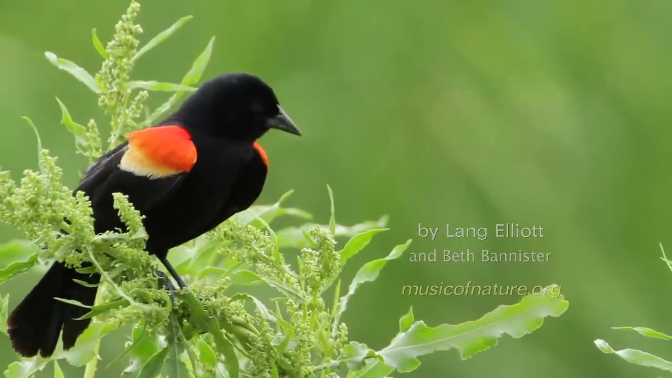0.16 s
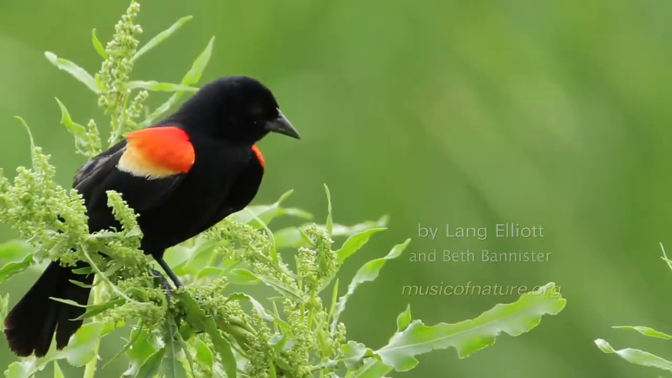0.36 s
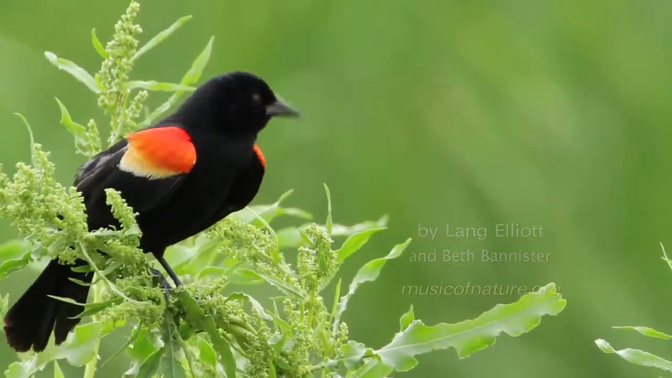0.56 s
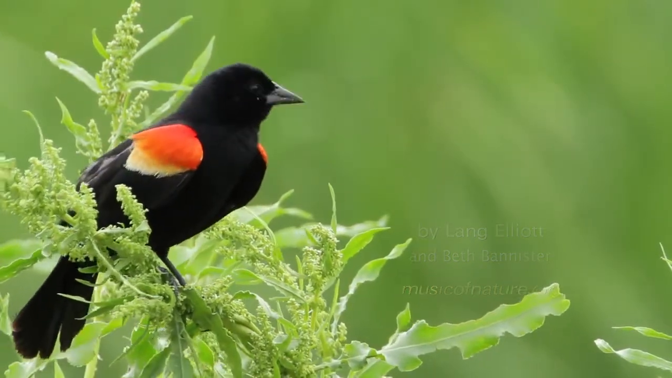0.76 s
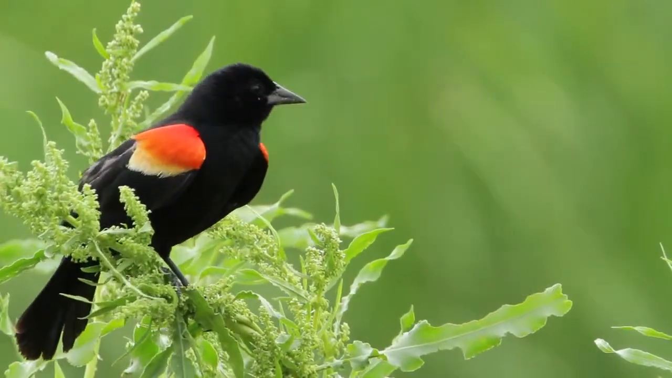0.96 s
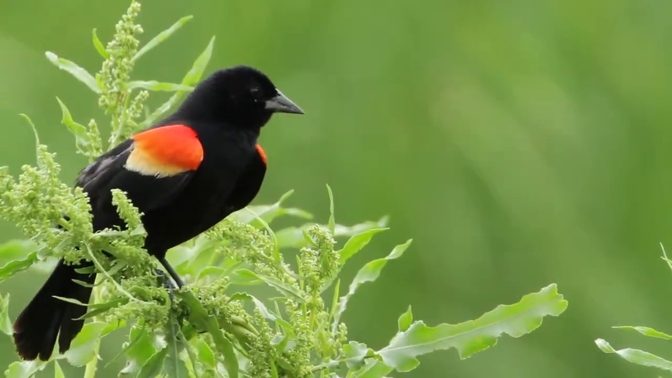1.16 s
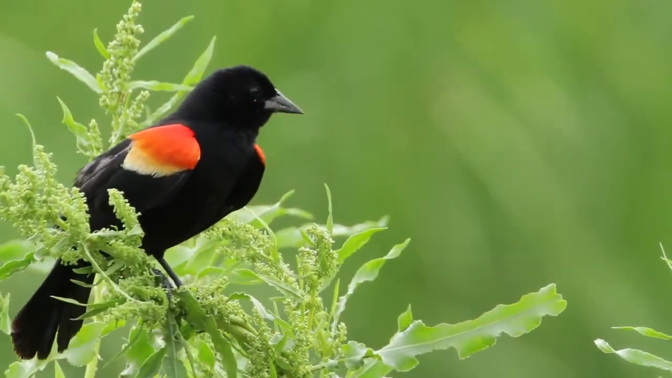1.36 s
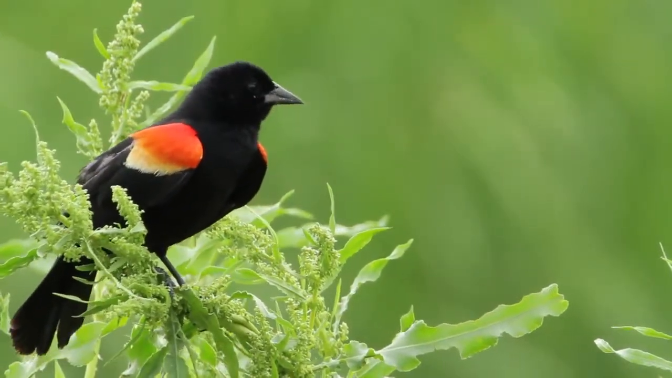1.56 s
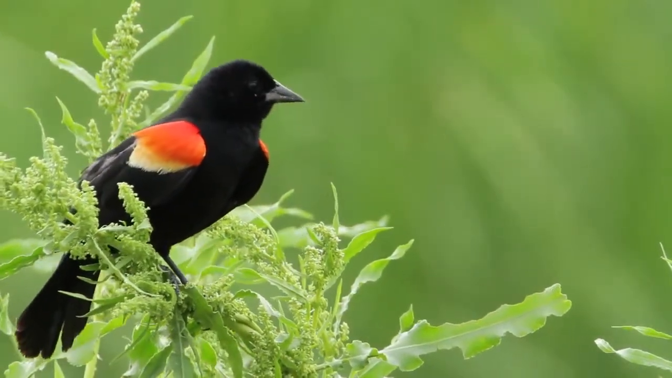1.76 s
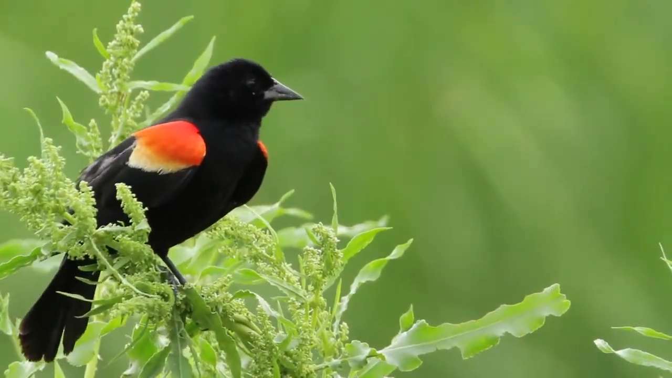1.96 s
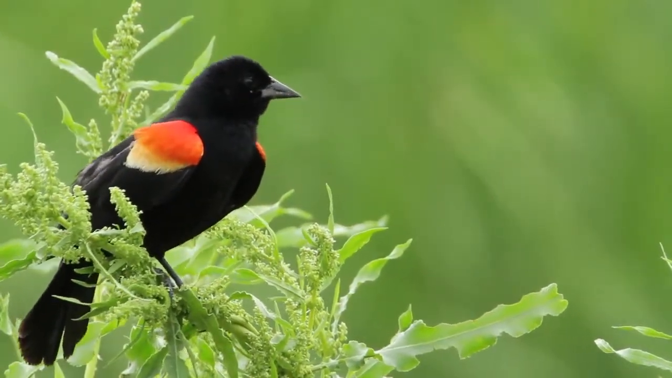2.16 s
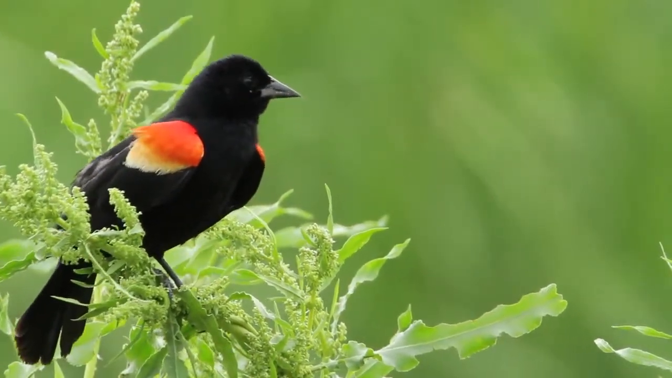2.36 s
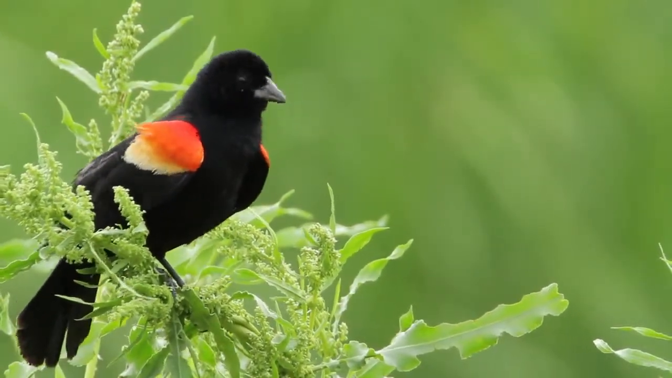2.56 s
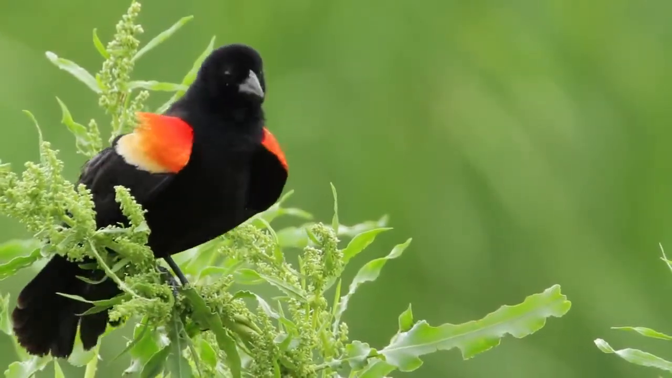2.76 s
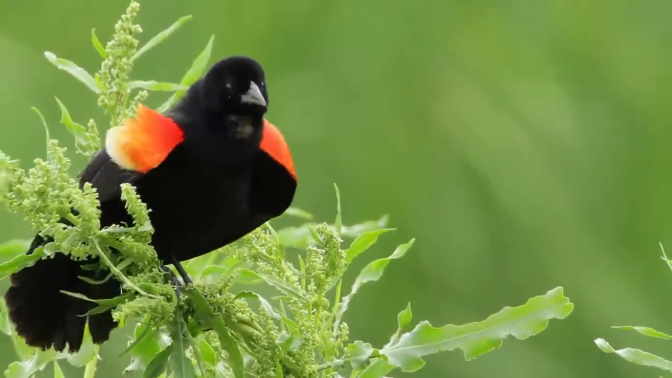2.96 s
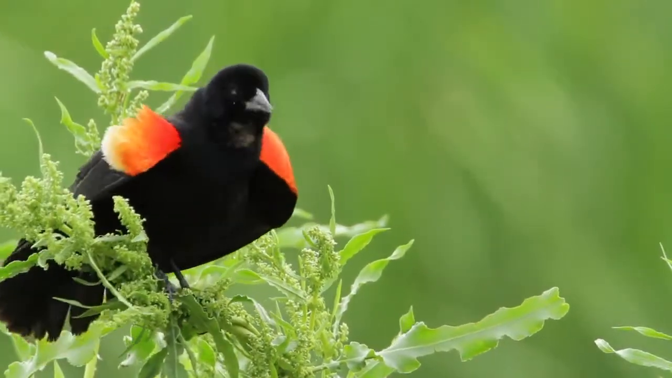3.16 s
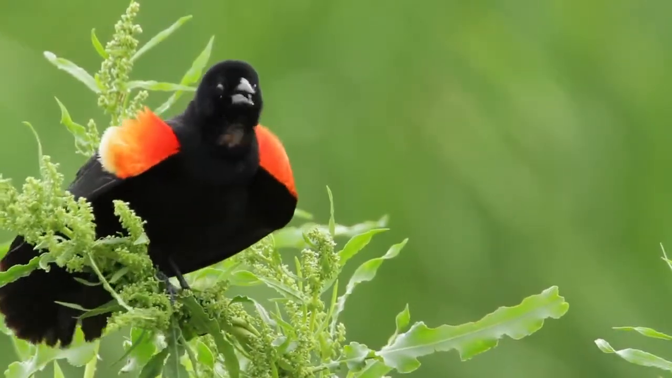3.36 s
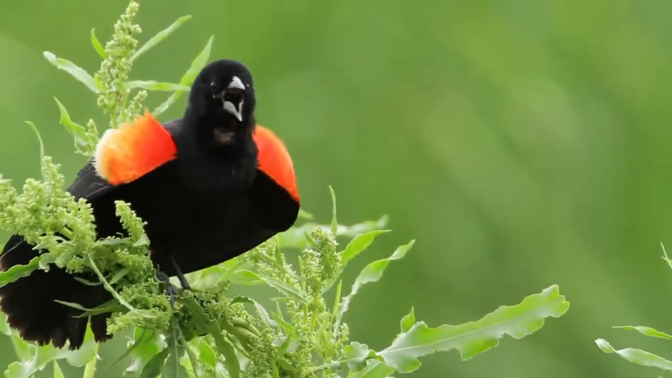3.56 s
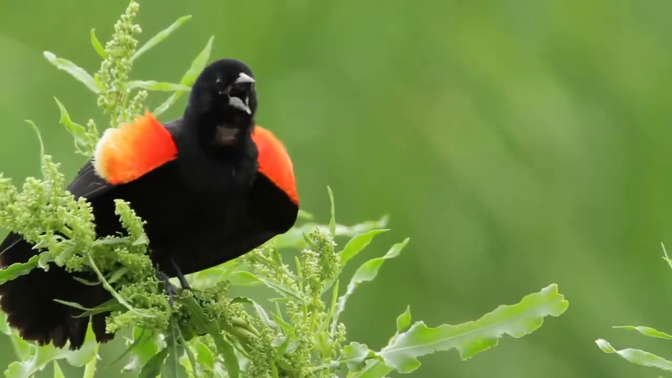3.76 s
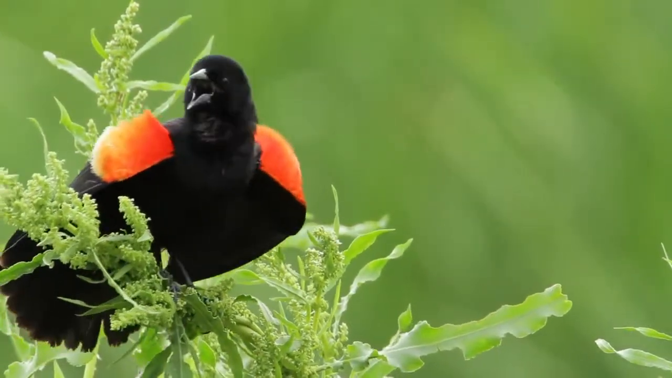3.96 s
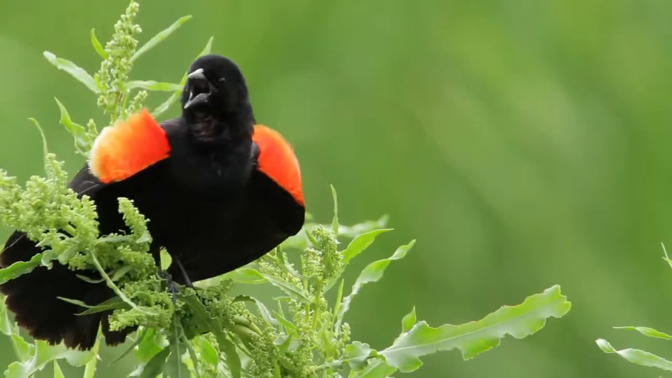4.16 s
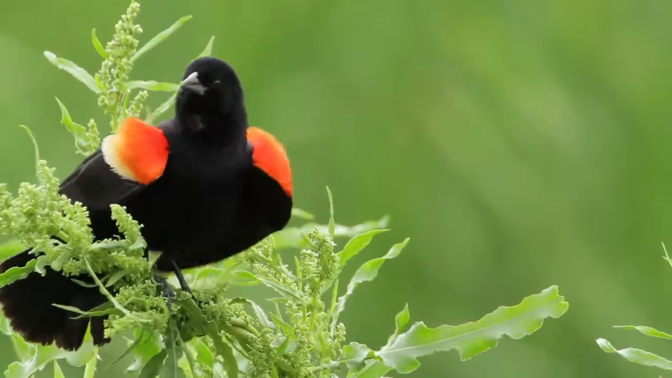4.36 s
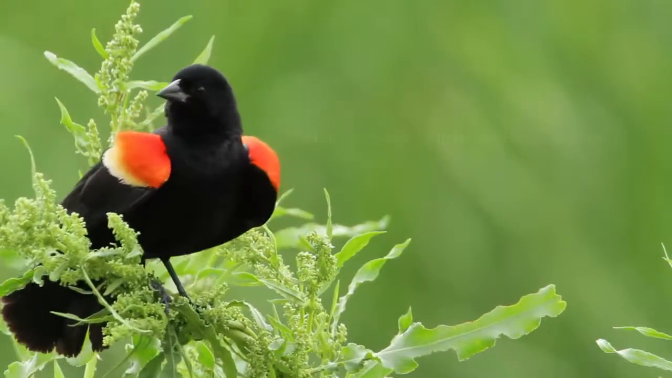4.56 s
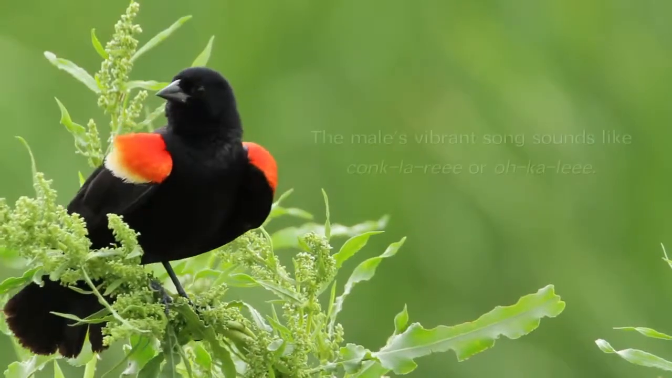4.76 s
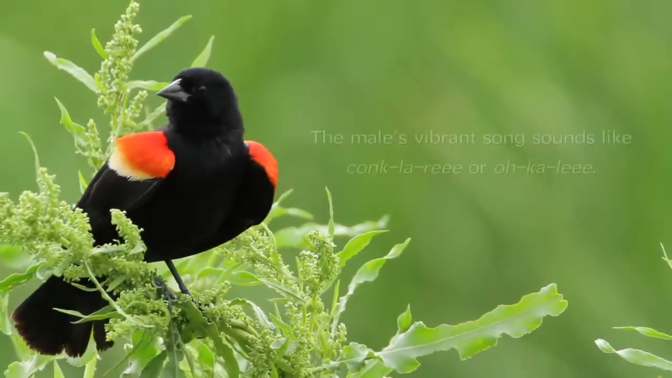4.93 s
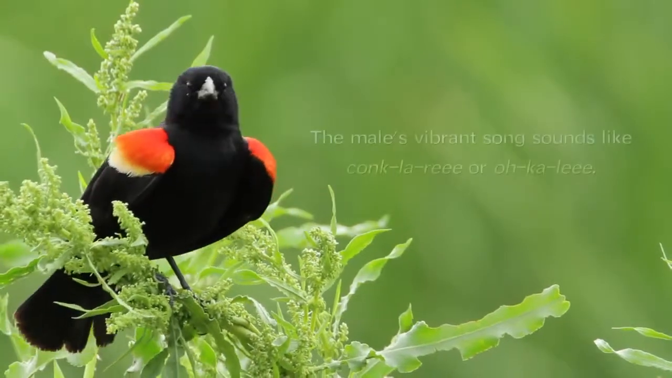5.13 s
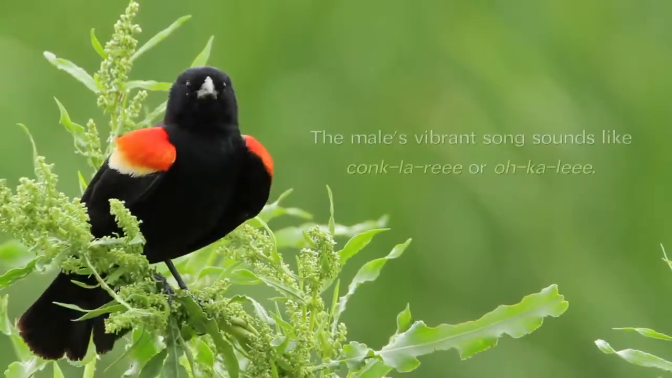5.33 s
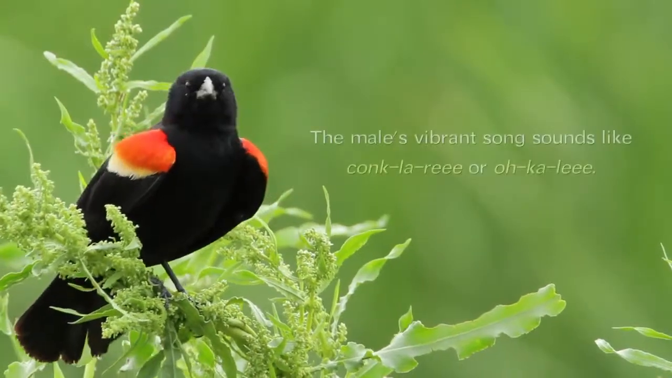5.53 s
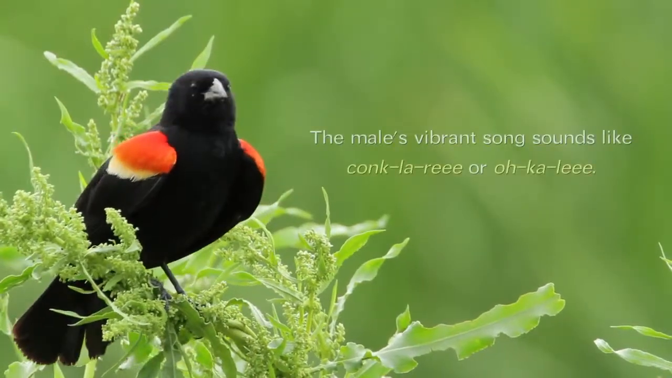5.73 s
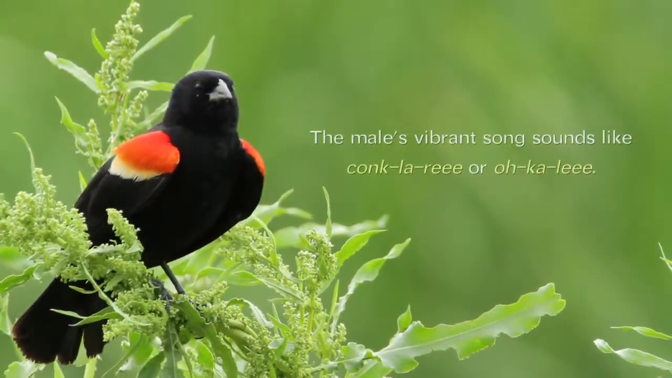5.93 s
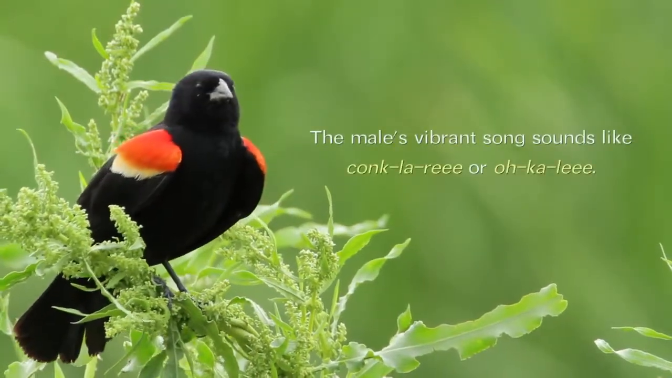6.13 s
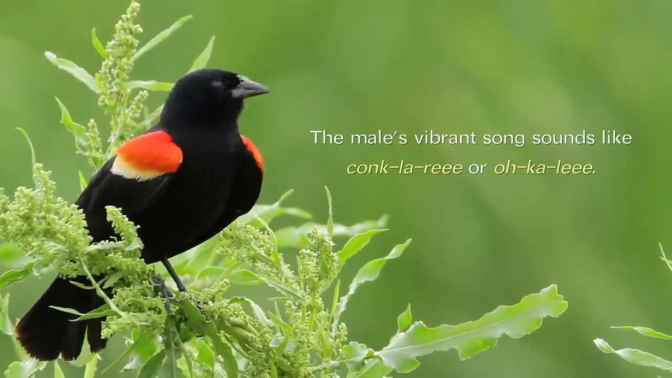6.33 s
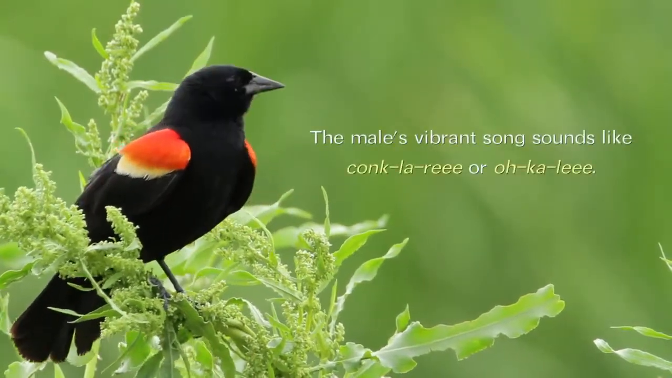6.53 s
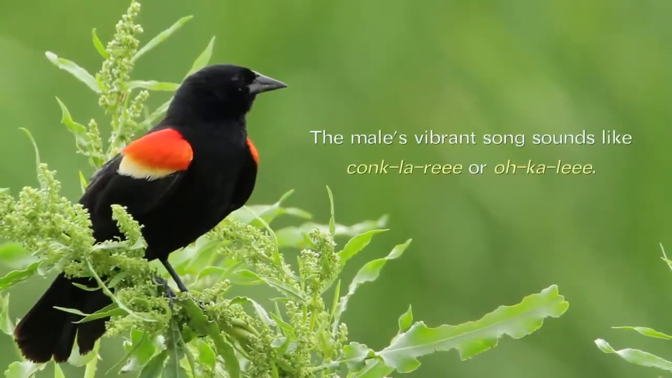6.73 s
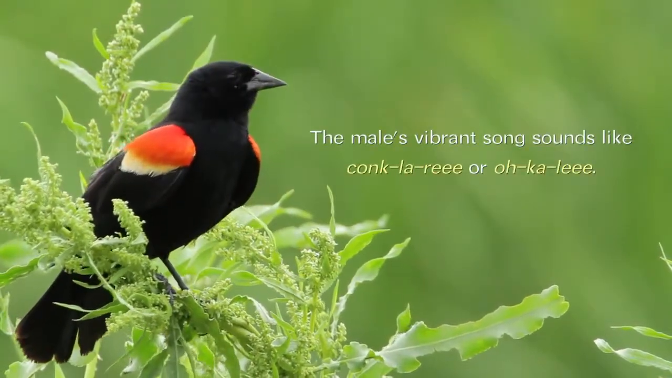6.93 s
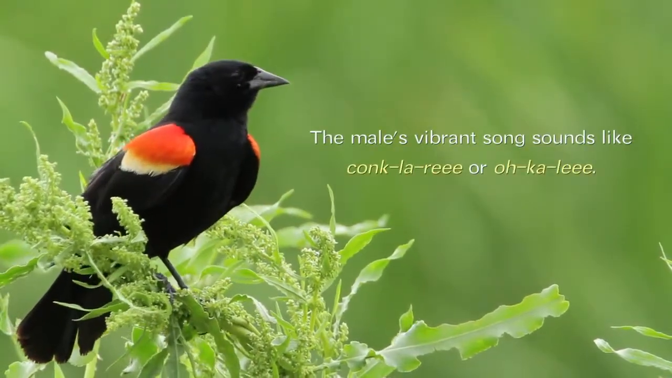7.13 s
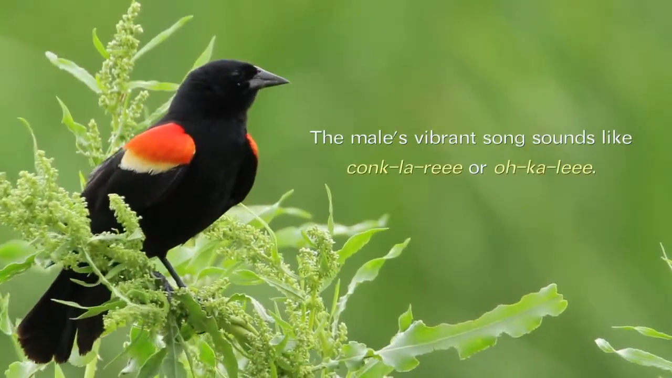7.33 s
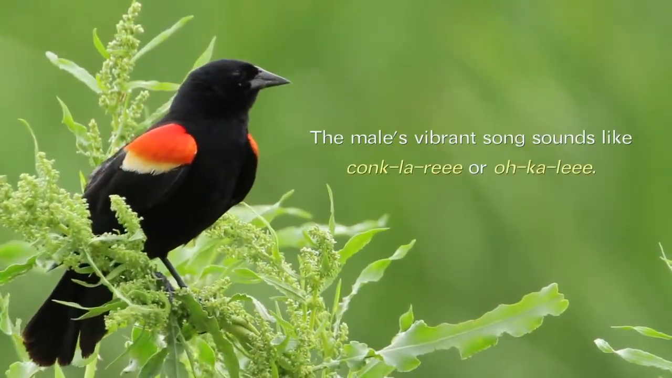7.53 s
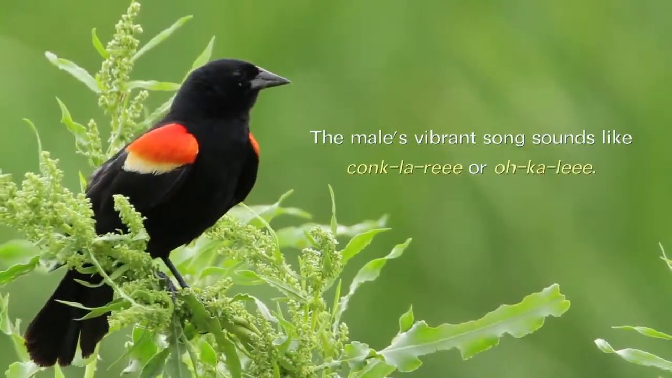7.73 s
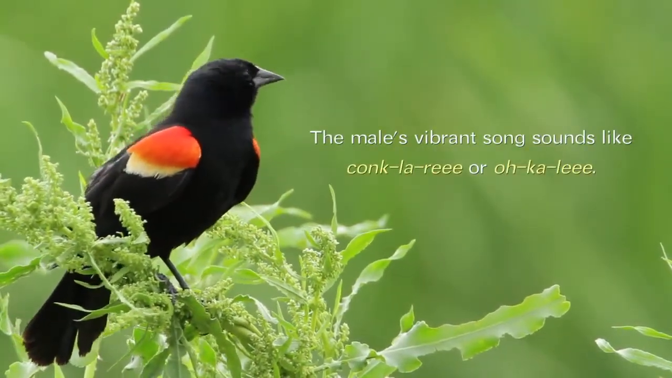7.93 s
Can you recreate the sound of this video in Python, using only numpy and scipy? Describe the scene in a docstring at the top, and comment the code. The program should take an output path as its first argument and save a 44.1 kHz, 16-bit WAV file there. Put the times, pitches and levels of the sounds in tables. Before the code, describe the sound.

A male blackbird sings once, close and loud, with a liquid falling gurgle that runs into a buzzy trill. Before it, small birds give thin chirps, rasps, faint croaks and quick high notes. After it, a female chatters in sharp, snapping notes, then light chips and whistles carry on. Other males trill in the distance across the open marsh, over a soft low rumble and faint birdsong.

```python
"""A male blackbird sings close by in a marsh: soft whistles, a falling gurgle, then a buzzy trill
in which one side of the syrinx holds each note while the other flicks against it.
Neighbouring males trill further off, a female chatters, small birds rasp, whistle, chip and croak.
Reeds scatter every call, over a low rumble and a faint chorus."""
import sys
import numpy as np
from scipy import signal
from scipy.fft import rfft, irfft, next_fast_len
from scipy.io import wavfile
from scipy.ndimage import uniform_filter1d

SR = 44100
rng = np.random.default_rng(int(sys.argv[2]) if len(sys.argv) > 2 else 0)


def master(y):
    """Save y as 16-bit WAV."""
    cut = np.clip(np.atleast_2d(y).T, -1, 1)
    pcm = np.round(cut * 32767)  # scale
    wavfile.write(sys.argv[1], SR, pcm.astype(np.int16))


N = 352359
TIME = np.arange(N) / SR
SIDE = np.array([[1], [-1]])


def undb(db):
    return 10 ** (np.asarray(db) / 20)


def unit(x):
    return x / np.sqrt(np.mean(x ** 2))


def columns(table, at):
    """Every column after the first, interpolated along the first."""
    axis, *rest = np.transpose(table)
    return [np.interp(at, axis, column) for column in rest]


def span(table):
    """The samples that a table of times covers."""
    return slice(max(int(table[0][0] * SR), 0), min(int(table[-1][0] * SR), N))


def place(start_s, n):
    """A slot of n samples, kept inside the scene."""
    i = min(max(int(start_s * SR), 0), N - n)
    return slice(i, i + n)


def add(out, where, x, pan_db=0):
    """Mixes x in; pan is left minus right."""
    out[:, where] += x * undb(SIDE * pan_db / 2)


def colour(n, spectrum):
    """Noise of rms 1, shaped by (frequency [Hz], density [dB])."""
    hz, db = np.transpose(spectrum)
    size = next_fast_len(n)
    bins_hz = np.arange(size // 2 + 1) * SR / size + 1
    gain = undb(np.interp(np.log(bins_hz), np.log(hz), db, left=-90, right=-90))
    return unit(irfft(rfft(rng.standard_normal(size)) * gain, size)[:n])


def wobble(n, rate_hz):
    """Smooth random drift of rms 1."""
    k = max(int(SR / rate_hz), 2)
    return unit(uniform_filter1d(uniform_filter1d(rng.standard_normal(n + k), k), k)[:n])


def tone(hz, db, orders=((1, 0),)):
    """Membrane tone with soft ends; orders are (harmonic, gain [dB])."""
    phase = 2 * np.pi * (np.cumsum(hz) / SR + rng.random())
    wave = sum(undb(gain_db) * np.sin(order * phase) for order, gain_db in orders)
    return np.sqrt(2) * undb(db) * wave * signal.windows.tukey(len(hz), min(300 / len(hz), 1))


def reeds(x, t60_s, wet_db, width):
    """Adds scatter from stems and leaves: a decaying stereo noise tail."""
    n = int(t60_s * SR)
    mid, side = rng.standard_normal((2, n)) * np.exp(-np.log(1000) * np.arange(n) / n)
    tail = (mid + width * side * SIDE) / np.sqrt(np.sum(mid ** 2))
    return x + undb(wet_db) * signal.oaconvolve(x, tail, axes=1)[:, :N]


# background spectrum: (frequency [Hz], density [dB])
AIR_COLOUR = [(12, -32), (20, 4.5), (87, -2), (289, -14.5), (393, -18), (1720, -19.5), (2150, -25),
              (2760, -10), (3450, -20.5), (4190, -47), (5090, -24), (6540, -31), (15500, -34.5)]
# tilt of its side channel: (frequency [Hz], gain [dB])
AIR_SIDE_TILT = [(20, -26.5), (125, -15), (500, 3), (1500, 8.5), (5000, 9), (15000, -43)]


def air(level_db=-57):
    """Far rumble and hiss; the bass is nearly mono."""
    side_colour = [(hz, db + columns(AIR_SIDE_TILT, hz)[0]) for hz, db in AIR_COLOUR]
    return undb(level_db) * (colour(N, AIR_COLOUR) + undb(-3) * colour(N, side_colour) * SIDE)


# chorus envelope, early and late part: (time [s], level [dB])
CHORUS_LEVEL = [
    [(0.0, -45.5), (0.97, -65.5), (3.3, -50)],
    [(5.2, -54.5), (5.7, -47), (7.99, -53.5)],
]
# chorus spectrum: (frequency [Hz], density [dB])
CHORUS_COLOUR = [(900, -18), (1500, -10.5), (2200, -6.5), (2700, 2.5), (3600, 2.5), (5200, -2), (6000, -19),
                 (8500, -19)]


def chorus(count=650, trim_db=-2.5):
    """Countless far songs: a flickering blur with short arched twitters in it."""
    mid, side = (colour(N, CHORUS_COLOUR) * undb(1.9 * wobble(N, 23)) for _ in range(2))
    blur = undb(-4) * (mid + .5 * side * SIDE)
    calls = np.zeros((2, N))
    for start, pitch, bend, arch, length, size, pan in rng.random((count, 7)):
        low = (1 - pitch) ** 2  # lower voices whistle longer and flatter
        n = int((.012 + .0443 * length) * (1 + .85 * low) * SR)
        i = int(start * (N - SR // 10))
        u = np.linspace(-1, 1, n)
        contour = .25 * (bend - .6) * u - .12 * arch * u ** 2
        hz = 900 * 7.5 ** pitch * (1 + (1 - .8 * low) * contour)
        db = -7 + 6.5 * size ** 2 + .8 * columns(CHORUS_COLOUR, hz)[0]
        add(calls, slice(i, i + n), tone(hz, db) * np.hanning(n), 14 * (pan - .5))
    level_db = columns(CHORUS_LEVEL[0] + CHORUS_LEVEL[1], TIME)[0] + trim_db
    return (blur + reeds(calls, t60_s=.12, wet_db=0, width=.36)) * undb(level_db)


# one trill note, each side of the syrinx: (beat phase [0-1], pitch [ratio], gain [dB])
HELD_SIDE = [(0, 1.08, -14), (.03, 1.065, -2), (.16, 1.032, 0.5), (.5, 1.01, 0), (.75, .997, -.5),
             (.79, 1.07, -9), (.83, 1.04, -18), (.9, 1.0, -13), (.97, 1.05, -20), (1, 1.08, -14)]
FLICK_SIDE = [(0, 1.28, -13), (.04, 1.22, -3), (.13, 1.2, -7), (.3, 1.19, -16), (.6, 1.18, -22),
              (.78, 1.3, -22), (.82, 1.45, -20), (.86, 1.95, -22), (.92, 1.92, -15), (.97, 1.5, -24),
              (1, 1.28, -13)]
# breath spectrum: (frequency [Hz], density [dB])
BREATH_COLOUR = [(1400, -19), (1900, -7), (2400, -22.5), (3200, 5.5), (4200, -4), (5300, -1), (6200, -26),
                 (7600, -34), (9500, -24), (12500, -21), (15700, -25.5)]


def trill(beat, hz, db, waver, flick_gain_db, breath_db, throb_db):
    """Each beat, one side of the syrinx holds a note, the other plunges against it; air rasps."""
    phase, n = beat % 1, len(beat)
    held_pitch, held_db = columns(HELD_SIDE, phase)
    flick_pitch, flick_db = columns(FLICK_SIDE, phase)
    handover = np.exp(-((phase - .88) / .07) ** 2)
    slip = (.004 * waver + .025 * handover) * wobble(n, 300)  # breaks coherence between notes
    held_db += waver * wobble(n, 490)
    held = tone(hz * held_pitch * (1 + slip), held_db, [(1, -2.5), (2, -28.5)])
    flick_hz = hz * flick_pitch * (1 + .0303 * wobble(n, 421))
    flick = tone(flick_hz, flick_db + flick_gain_db + 2.3 * wobble(n, 440))
    breath = undb(breath_db) * (1 + 1.9 * handover) * colour(n, BREATH_COLOUR)
    throb = throb_db * np.cos(2 * np.pi * (phase - .35))
    return undb(db + throb) * (held + flick + breath)


# far trills: (time [s], length [s], pitch [Hz], opening rate [Hz], first beat phase [0-1],
# opening level [dB], closing level [dB], flick gain [dB], pan [dB])
FAR_TRILLS = [(0., 0.86, 2635, 61, 0.28, -50, -63, 5, 12), (.85, 1, 2752, 48, 0.11, -58.5, -64.5, 7.5, 7),
              (2.197, 0.49, 2633, 56, 0.14, -64, -66.5, 9, 21),
              (4.339, .835, 2723, 67, 0.31, -43, -41, 1, -9.5),
              (5.664, .66, 2729, 48.0, .3, -49.5, -48, 4, 11),
              (6.45, 0.48, 2766, 52.0, 0.31, -76, -59, -5, -2),
              (6.902, 0.83, 2730, 47, 0.22, -57.5, -57.5, 9.5, 9),
              (7.802, .19, 2750, 36, 0.2, -74, -65, 3, 14)]


def neighbours(slowing_hz_per_s=2.5, fade_s=.02):
    """Rough, slowing trills of far males; the long air path takes the treble."""
    out = np.zeros((2, N))
    for start_s, length_s, hz, rate_hz, phase, open_db, close_db, flick_db, pan_db in FAR_TRILLS:
        t = np.arange(int(length_s * SR)) / SR
        beat = phase + rate_hz * t - slowing_hz_per_s * t ** 2 / 2
        db = open_db + (close_db - open_db) * t / length_s
        song = trill(beat, hz, db, waver=2.58, flick_gain_db=flick_db, breath_db=-12.5, throb_db=2.7)
        fade = signal.windows.tukey(len(t), 2 * fade_s / length_s)
        add(out, place(start_s, len(t)), song * fade, pan_db)
    dulled = signal.sosfilt(signal.butter(4, 6500, fs=SR, output="sos"), out)
    return reeds(dulled, t60_s=.3, wet_db=-10, width=.3)


# rasping calls: (time [s], length [s], centre [Hz], width [Hz], buzz [Hz], level [dB])
RASPS = [(0, 0.08, 4600, 1980, 61, -51.5), (0.461, 0.031, 4430, 1500, 120, -54),
         (1.725, 0.18, 7500, 1520, 110, -59.5), (1.698, 0.17, 4100, 2520, 90, -54),
         (1.994, 0.13, 6400, 600, 120, -56.5), (2.043, 0.027, 3610, 800, 145, -45.5),
         (2.087, 0.091, 3830, 2000, 116, -46), (3.25, 0.073, 3260, 2670, 540, -44),
         (4.757, 0.082, 5100, 1200, 91, -50.5), (5.545, 0.065, 1960, 500, 75, -48.5),
         (7.046, 0.11, 7600, 1200, 99, -65), (7.202, 0.098, 7570, 1200, 81, -63.5),
         (7.514, 0.08, 6500, 3000, 110, -61)]


def rasps():
    """Small birds rasp: throbbing bands of noise."""
    out = np.zeros((2, N))
    for start_s, length_s, hz, width, buzz_hz, db in RASPS:
        n = int(length_s * SR)
        band = colour(n, [(hz - width, -24), (hz - width / 2, 0),
                          (hz + width / 2, 0), (hz + width, -24)])
        throb = 1 + .28 * np.sin(2 * np.pi * buzz_hz * np.arange(n) / SR)
        add(out, place(start_s, n), undb(db) * band * throb * signal.windows.tukey(n, .6))
    return out


def glide(length_s, first, last):
    """Straight pitch contour, 3 dB down at the ends."""
    return [(0, first, -3), (length_s / 2, (first + last) / 2, 0), (length_s, last, -3)]


def sing(out, start_s, contour, hz, db, pan_db=0, orders=((1, 0),), rough=1):
    """Mixes in one note that wavers in pitch and level."""
    pitch, gain_db = columns(contour, np.arange(int(contour[-1][0] * SR)) / SR)
    n = len(pitch)
    pitch *= 1 + .0034 * rough * wobble(n, 170)
    gain_db += .61 * rough * wobble(n, 110)
    add(out, place(start_s, n), tone(hz * pitch, db + gain_db, orders), pan_db)


# plain whistles: (time [s], length [s], first pitch [Hz], last pitch [Hz], level [dB], pan [dB])
WHISTLES = [(0.004, 0.042, 1582, 1500, -53.5, -1), (0.404, 0.044, 2200, 2320, -55.5, 16),
            (0.517, 0.072, 3385, 3330, -59, 15), (0.543, 0.03, 5060, 5100, -57, 6),
            (0.569, .11, 1572, 1620, -58, -10), (.83, 0.14, 8350, 8100, -69, 0),
            (1.265, 0.075, 8160, 8150, -69, 0), (1.431, 0.11, 2340, 2270, -65, 0),
            (1.623, 0.059, 8200, 8200, -65, 0), (1.879, 0.06, 2354, 2280, -56, 18),
            (1.954, 0.026, 3150, 3390, -53.5, -7), (1.981, 0.13, 1100, 1230, -62, 0),
            (2.173, 0.09, 4300, 4120, -54, 0), (4.373, 0.061, 5200, 4920, -44, -4),
            (4.682, 0.046, 1830, 1824, -53.5, -10), (5.213, 0.1, 1710, 1664, -56.5, 18),
            (5.482, .058, 6220, 6240, -62.5, 4), (5.49, 0.095, 2420, 2310, -59, 18),
            (6.066, 0.082, 1657, 1590, -58.5, -6), (6.483, 0.14, 1585, 1615, -51.5, 2.5),
            (6.556, 0.058, 4350, 4170, -54, 0), (6.928, 0.055, 7600, 7600, -60, 0),
            (6.935, .04, 6750, 6670, -58, -3), (7.013, 0.079, 3550, 3200, -51.5, -7),
            (7.119, 0.042, 1876, 1880, -54, 1), (7.391, 0.039, 2205, 2260, -58.5, 15),
            (7.932, 0.068, 1483, 1524, -58.5, 4)]


def whistles():
    """Small birds whistle pure, gliding tones."""
    out = np.zeros((2, N))
    for start_s, length_s, first_hz, last_hz, db, pan_db in WHISTLES:
        sing(out, start_s, glide(length_s, 1, last_hz / first_hz), first_hz, db, pan_db)
    return out


# note contours by name: (time [s], pitch [ratio], gain [dB])
CONTOURS = {"arch": [(0, .74, -24), (.011, .91, -7), (.021, 1.0, 0), (.031, .89, -7), (.043, .7, -22)],
            "hook": [(0, .84, -20), (.012, .94, -6), (.022, 1.0, 0), (.032, 1.005, -1), (.041, .99, -26)],
            "slur": [(0, 1.07, -30), (.014, 1.05, -8), (.042, 1.0, 0), (.072, .86, -4), (.1, .71, -17),
            (.127, .6, -27)], "dip": [(0, 1.08, -12), (.024, 1.0, -1), (.045, 1.015, 0), (.085, 1.05, -7),
            (.125, 1.03, -19)], "bow": [(0, .9, -8), (.01, .97, -4), (.025, 1.0, 0), (.04, .995, 0),
            (.054, .87, -5)], "steps": [(0, 1.07, -6), (.008, 1.08, 0), (.02, 1.0, 0), (.04, 1.0, -3),
            (.055, .88, -8)]}
# song notes: (time [s], contour, pitch [Hz], level [dB], pan [dB])
SONG_NOTES = [(.115, "arch", 7150, -70, 6), (.225, "arch", 7200, -70, 6), (.712, "bow", 7050, -70.5, 6),
              (.885, "steps", 5300, -72, 8), (1.052, "steps", 5450, -65.5, 5), (1.172, "bow", 7110, -73, 8),
              (1.295, "bow", 6950, -74, 8), (1.265, "steps", 5450, -64, 10), (1.367, "dip", 3953, -42, -1),
              (1.4, "steps", 5270, -64.5, 9), (1.503, "dip", 3556, -39.5, -1.5),
              (1.631, "steps", 5560, -63.5, 7), (1.648, "arch", 4430, -49.5, 0),
              (1.981, "hook", 6500, -43, -0.5), (2.0, "arch", 3010, -53, 0), (2.03, "steps", 4310, -55, 9),
              (2.22, "arch", 3930, -36, 1), (2.281, "hook", 3970, -39, -0.5),
              (2.371, "slur", 4235, -33.5, -1), (2.585, "arch", 4002, -33, -0.5),
              (2.631, "arch", 4780, -50, 0), (2.643, "hook", 4040, -33.5, -2),
              (2.734, "slur", 4290, -32, 0), (2.868, "arch", 4230, -50, 0), (2.951, "arch", 3880, -34, -2),
              (3.006, "hook", 3910, -33.5, -1.5), (3.091, "slur", 4310, -32, -1),
              (3.312, "arch", 3880, -35, -1.5), (3.375, "hook", 3850, -35.5, -2),
              (5.41, "bow", 6340, -63.5, -21), (5.831, "bow", 6220, -58.5, -21),
              (6.352, "hook", 6420, -59.5, -2), (7.535, "hook", 5700, -49, -2),
              (7.615, "steps", 5500, -61, 1), (7.833, "hook", 6850, -58, -1)]


def song_notes():
    """Small birds sing arched, hooked and slurred notes."""
    out = np.zeros((2, N))
    for start_s, shape, hz, db, pan_db in SONG_NOTES:
        sing(out, start_s, CONTOURS[shape], hz, db, pan_db)
    return out


def plunges(rows, hoarse, wet_db, length_s=.013, trim_db=-18):
    """Quick falls in pitch, scattered by the reeds; rows as in CHIPS."""
    out, n = np.zeros((2, N)), int(length_s * SR)
    for start_s, db, middle_hz, fall_oct, pan_db in rows:
        hz = middle_hz * 2 ** (fall_oct * np.linspace(.5, -.5, n))
        hz *= 1 + hoarse * wobble(n, 1500)
        add(out, place(start_s, n), tone(hz, db + trim_db + 3 * wobble(n, 600)), pan_db)
    return reeds(out, t60_s=.2, wet_db=wet_db, width=.26)


# chip calls: (time [s], level before trim [dB], middle pitch [Hz], fall [octaves], pan [dB])
CHIPS = [(0.249, -38.5, 1570, 1.7, 3), (0.492, -44, 1560, 1.7, 4), (0.608, -31, 4340, 0.88, -8),
         (0.8655, -36, 4160, .8, 3), (0.962, -39, 2510, .7, 3), (1.352, -33, 4120, .9, -5),
         (1.9204, -32.5, 3860, 0.76, -5), (6.7167, -41, 4610, 0.66, -19), (6.848, -26.5, 2054, 0.53, -2),
         (6.984, -30, 4200, 0.86, -2), (7.466, -23, 3850, 0.31, 0.5), (7.5403, -34, 3630, .9, -1),
         (7.586, -31, 4570, 0.89, 1), (7.703, -37, 3840, 1.4, -18)]


def chips():
    """Thin chips all around, each one plunge in pitch."""
    return plunges(CHIPS, hoarse=.04, wet_db=.5)


# croaking calls: (time [s], length [s], pitch [Hz], level [dB])
CROAKS = [(1.497, 0.024, 446, -61), (1.537, 0.035, 458, -49), (1.598, 0.026, 443, -47.5),
          (1.718, 0.068, 441, -46.5), (1.878, 0.039, 460, -58), (1.914, 0.025, 449, -49.5),
          (2.95, 0.032, 472, -52.5), (3.003, .032, 429, -47), (3.062, 0.034, 375.5, -42),
          (3.128, .03, 448, -50), (3.275, 0.0555, 386.6, -46), (5.718, 0.017, 457, -53),
          (5.793, 0.03, 365, -54.5), (6.304, .03, 466, -51.5), (6.721, 0.069, 377, -54)]
# croak timbre: (harmonic, gain [dB])
CROAK_ORDERS = [(1, -17), (2, -24), (3, 0), (4, -7), (5, -18)]


def croaks():
    """Low, rough, sagging calls, strongest at the third harmonic."""
    out = np.zeros((2, N))
    for start_s, length_s, hz, db in CROAKS:
        sing(out, start_s, glide(length_s, 1.01, .94), hz, db, orders=CROAK_ORDERS, rough=7.5)
    return out


def pips(start_s=2.308, period_s=.213, length_s=.034):
    """An even row of five high pips."""
    out = np.zeros((2, N))
    for k in range(5):
        sing(out, start_s + k * period_s, glide(length_s, 1, 1), hz=6030, db=-52.5, rough=.93)
    return out


# near male's notes, one table per high whistle: (time [s], pitch [Hz], level [dB])
LOW_WHISTLE = [(3.13, 1202, -75), (3.29, 1182, -36.5), (3.41, 1213, -67)]
HIGH_WHISTLES = [
    [(3.145, 2380, -58), (3.17, 2352, -40.5), (3.21, 2348, -37), (3.25, 2286, -58)],
    [(3.36, 2400, -73), (3.376, 2500, -33), (3.3805, 2500, -43), (3.3825, 2350, -28), (3.386, 2570, -27),
     (3.391, 2620, -34), (3.406, 2650, -57.5)],
    [(3.6, 2510, -51), (3.624, 2440, -42.5), (3.632, 2600, -40), (3.642, 2740, -39)],
    [(4.3, 3460, -41), (4.315, 3400, -35.5), (4.336, 3200, -42)],
    [(4.305, 2700, -54), (4.335, 2554, -35.5), (4.36, 2480, -53)],
]
PRESSED_NOTE = [(3.405, 1630, -62), (3.417, 1640, -46), (3.424, 1665, -39), (3.428, 1670, -33),
                (3.432, 1660, -50)]
THIN_NOTE = [(3.602, 815, -70), (3.615, 822, -56), (3.628, 830, -68)]
# their timbres: (harmonic, gain [dB])
LOW_ORDERS = [(1, 1.5), (5, -27.5), (6, -25.5), (7, -21)]
PRESSED_ORDERS = [(1, -3), (2, 11), (3, 1.5), (4, 1.5), (5, -6), (6, -15), (7, -9), (8, -19), (9, -19)]
THIN_ORDERS = [(7, 10), (8, 7.5), (9, 11), (10, 4.5)]


def male_whistles():
    """Whistles open and close the song; a brassy note leads into the gurgle, a thin one follows it."""
    out = np.zeros((2, N))
    notes = [(LOW_WHISTLE, LOW_ORDERS), (PRESSED_NOTE, PRESSED_ORDERS), (THIN_NOTE, THIN_ORDERS)]
    notes += [(whistle, [(1, 3), (2, -43.5)]) for whistle in HIGH_WHISTLES]
    for contour, orders in notes:
        hz, db = columns(contour, TIME[span(contour)])
        add(out, span(contour), tone(hz, db, orders))
    return out


# gurgle contour: (time [s], pitch [Hz], level [dB])
GURGLE = [(3.423, 2683, -31), (3.439, 2480, -18), (3.45, 2437, -12.5), (3.462, 2262, -13.5),
          (3.487, 1865, -15.5), (3.518, 1716, -21.5), (3.575, 1577, -23), (3.6, 1550, -30.5)]
# its slowing beat: (time [s], bursts so far)
GURGLE_BEAT = [(3.4235, 0.), (3.4445, 2.), (3.455, 3.), (3.493, 6.), (3.51, 7.), (3.53, 8.), (3.589, 11.),
               (3.605, 11.8)]
# one burst: (beat phase [0-1], pitch [ratio], gain [dB])
GURGLE_BURST = [(0, .94, -22), (.08, .95, -6), (.42, 1.0, 0), (.65, 1.04, -5), (.82, 1.1, -20),
                (1, 1.0, -26)]
# airy top: (frequency [Hz], density [dB])
SHEEN_COLOUR = [(5500, -5), (8000, 4), (12000, -3), (15500, -12)]


def male_gurgle(plunge_peak_s=3.44):
    """One side of the syrinx sings falling bursts; the other plunges at first, then only rustles."""
    out, t = np.zeros((2, N)), TIME[span(GURGLE)]
    hz, db = columns(GURGLE, t)
    phase = columns(GURGLE_BEAT, t)[0] % 1
    pitch, burst_db = columns(GURGLE_BURST, phase)
    bursts = tone(hz * pitch, db + burst_db, [(1, 0), (2, -30), (3, -46), (5, -48)])
    plunge_db = -21 - 40 * phase - 30 * np.exp(-phase / .03) - 550 * np.abs(t - plunge_peak_s)
    plunge = tone(3000 + 2500 * np.exp(-phase / .1), plunge_db)
    rustle = colour(len(t), BREATH_COLOUR) + undb(-11) * colour(len(t), SHEEN_COLOUR)
    add(out, span(GURGLE), bursts + plunge + undb(db - 35) * rustle)
    return out


# near trill envelope: (time [s], level [dB])
TRILL_LEVEL = [(3.642, -15.5), (3.648, -19.5), (3.9, -18.5), (4.295, -18.5), (4.306, -23), (4.314, -23.5),
               (4.38, -56)]


def male_trill(start_s=3.646, hz=2637, rate_hz=45.4, rush_notes=1.63, rush_s=.027, accent_s=.063):
    """The near trill opens in a rush with its strongest flicks, then settles."""
    out, where = np.zeros((2, N)), span(TRILL_LEVEL)
    t = TIME[where] - start_s
    beat = rate_hz * t + rush_notes * t / (t + rush_s)
    db = columns(TRILL_LEVEL, TIME[where])[0]
    accent_db = 5 * np.exp(-t / accent_s)
    add(out, where, trill(beat, hz, db, waver=.5, flick_gain_db=accent_db, breath_db=-21.5, throb_db=0))
    return out


# chatter: (time [s], pitch [Hz], level [dB], snap level before trim [dB], snap pitch [Hz])
CHATTER = [(5.214, 4280, -43, -60, 3200), (5.302, 4094, -40.5, -50, 3200), (5.392, 4170, -38.5, -50, 3200),
           (5.48, 4215, -36.5, -43, 3280), (5.561, 4404, -33, -32.5, 3110),
           (5.645, 4530, -32.5, -31.5, 3050), (5.735, 4480, -28.5, -31.5, 3135),
           (5.837, 4480, -28, -23.5, 3530), (5.939, 4420, -29, -20.5, 4170),
           (6.082, 4350, -29.5, -21, 4240), (6.192, 4290, -29, -17, 4094)]


def female(lead_s=.05, onset_hz=4454, peak_s=.022, note_s=.045, snap_s=.025, snap_oct=1.3):
    """Sharp notes from both sides of the syrinx, each led by a faint rise and closed by a snap."""
    out, n = np.zeros((2, N)), int(note_s * SR)
    rise = np.linspace(0, 1, int(lead_s * SR))
    for start_s, pitch_hz, peak_db, *_ in CHATTER:
        orders = [(1, 0), (2, -28 + 2.1 * (peak_db + 27))]  # the octave grows with effort
        contour = [(0, onset_hz, -7.5), (peak_s, pitch_hz, 0), (note_s, pitch_hz, -13)]
        hz, db = columns(contour, np.arange(n) / SR)
        for ratio, side_db in [(1, 0), (.92, -8)]:
            voice_hz = ratio * hz * (1 + .011 * wobble(n, 500))
            voice_db = peak_db + side_db + db + 3 * wobble(n, 250)
            add(out, place(start_s, n), tone(voice_hz, voice_db, orders))
        lead = tone(3000 + 1000 * rise, peak_db - 34 + 6 * rise)
        add(out, place(start_s - lead_s, len(rise)), lead)
    snaps = [(start_s + snap_s, db, hz, snap_oct, 0) for start_s, _, _, db, hz in CHATTER]
    return reeds(out, t60_s=.24, wet_db=-6, width=.17) + plunges(snaps, hoarse=.04, wet_db=2.2)


def scene():
    distance = air() + chorus() + neighbours()
    calls = rasps() + whistles() + song_notes() + croaks() + pips()
    small_birds = reeds(calls, t60_s=.48, wet_db=-12, width=.1) + chips()
    song = male_whistles() + male_gurgle() + male_trill()
    male = reeds(song, t60_s=.5, wet_db=-11.5, width=.067)
    return distance + small_birds + male + female()


def record(dry, top_hz=15550):
    """A steep low-pass cuts the top."""
    return signal.sosfilt(signal.ellip(10, .2, 80, top_hz, fs=SR, output="sos"), dry)


dry = scene()
out = record(dry)
master(out)
```